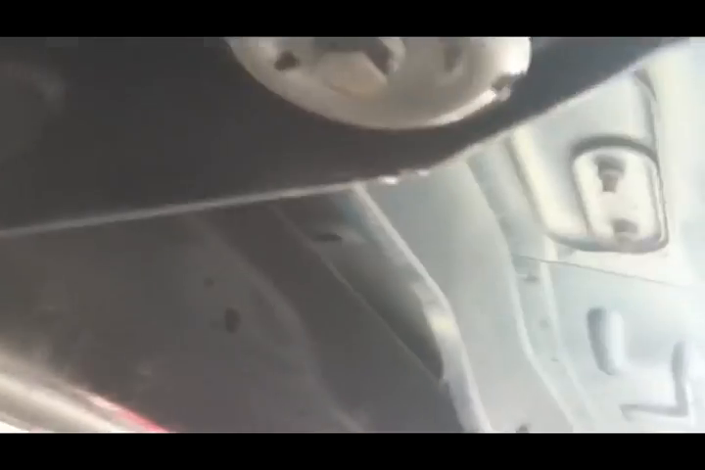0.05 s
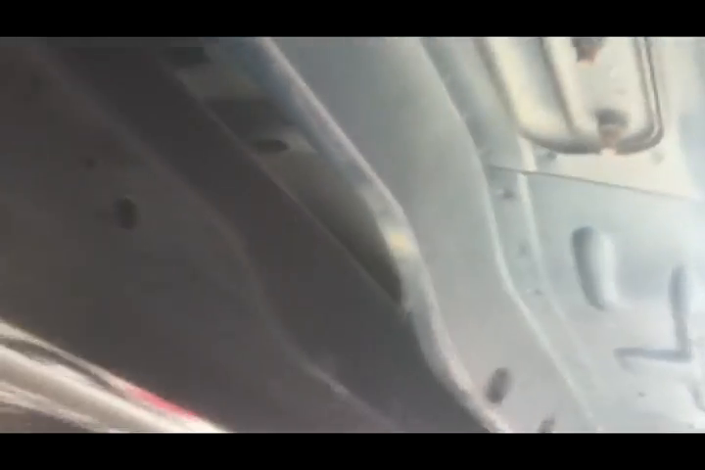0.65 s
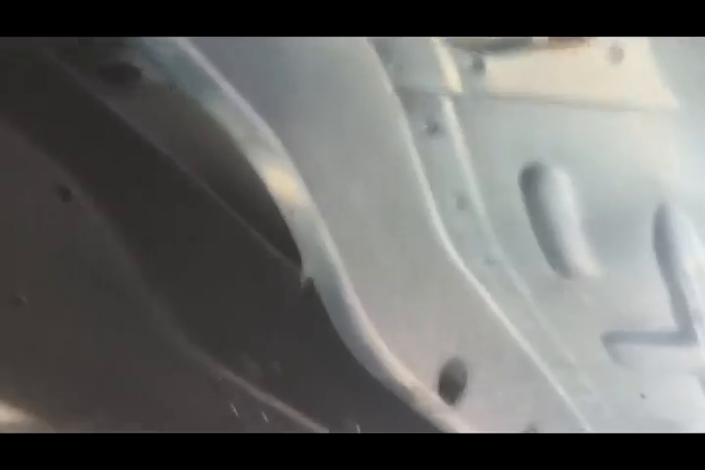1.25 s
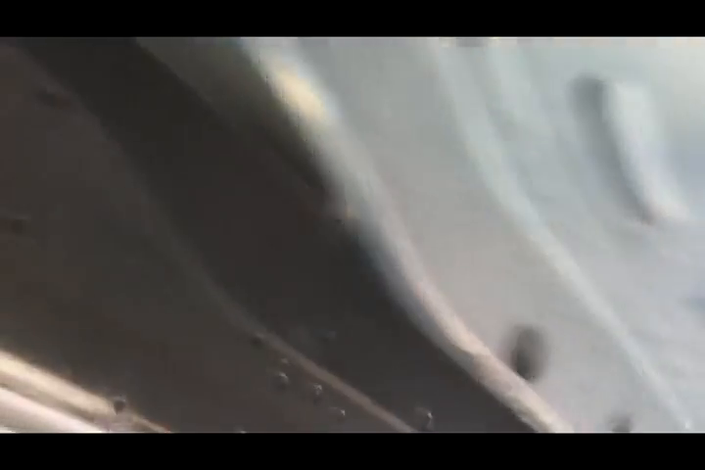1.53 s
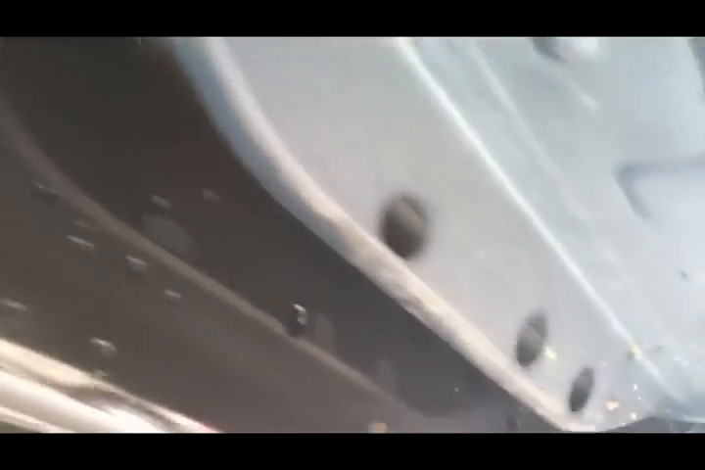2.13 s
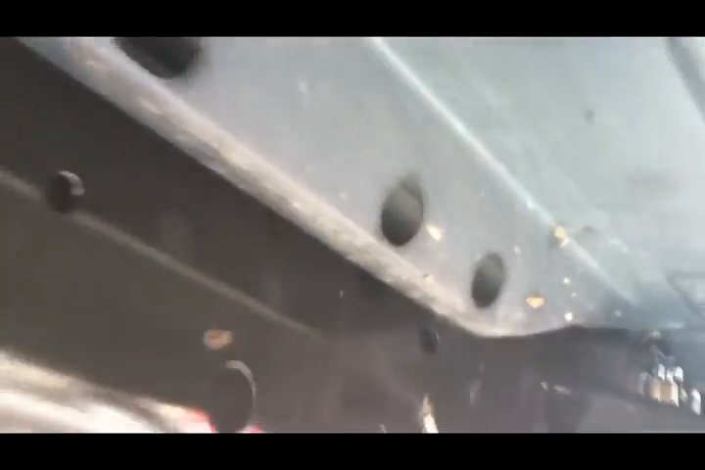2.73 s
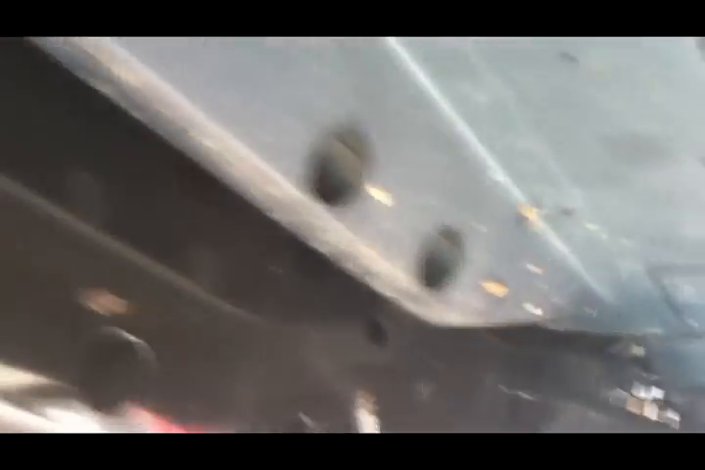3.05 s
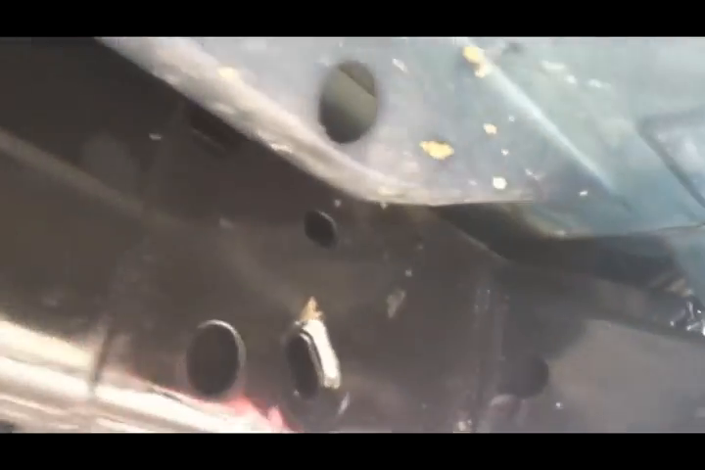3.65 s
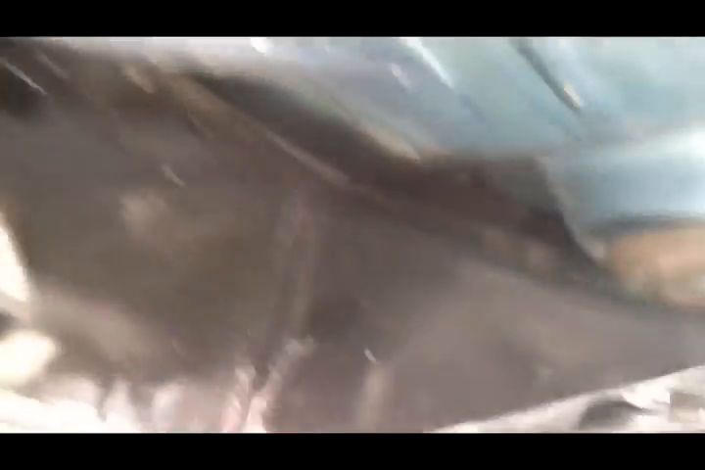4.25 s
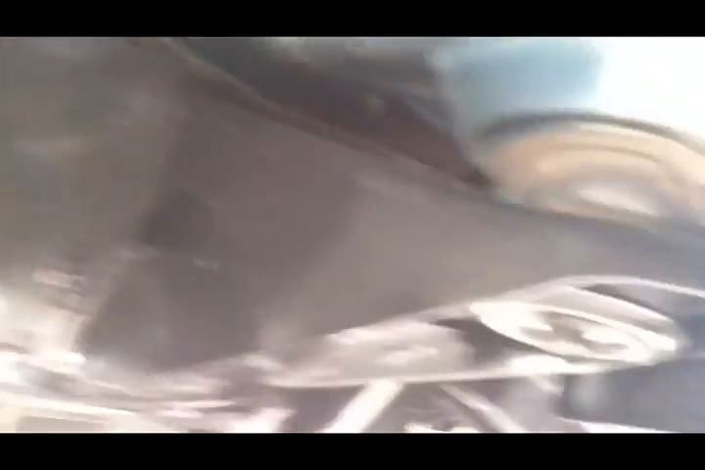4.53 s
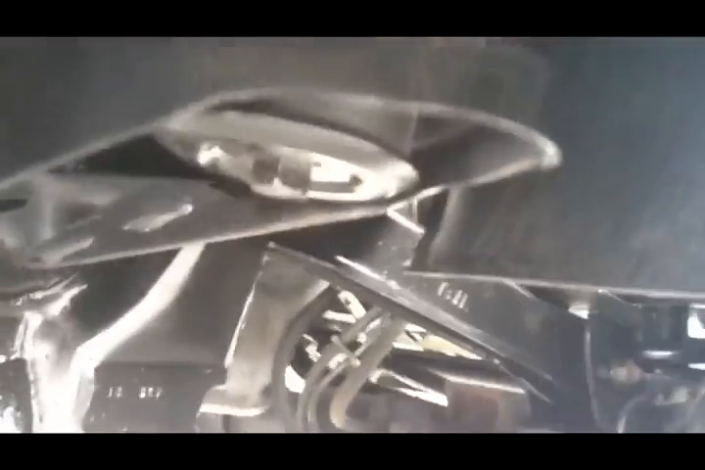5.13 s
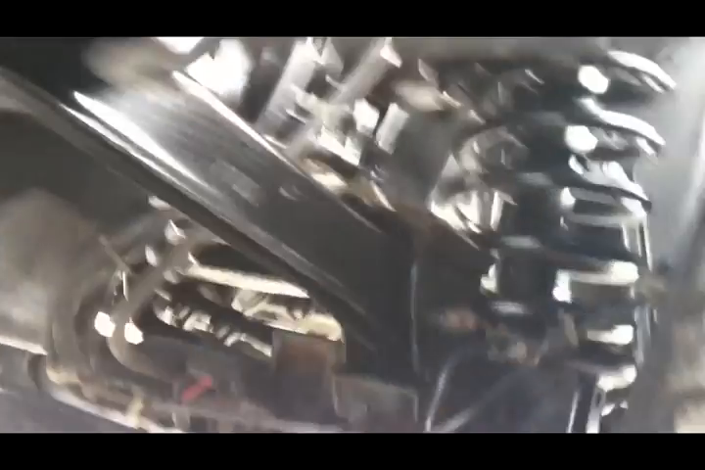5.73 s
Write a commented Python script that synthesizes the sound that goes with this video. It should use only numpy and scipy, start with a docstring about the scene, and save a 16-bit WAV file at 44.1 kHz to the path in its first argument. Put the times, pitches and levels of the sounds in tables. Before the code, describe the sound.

A handheld camera is moved about under a parked truck. Right at the microphone its plastic case gives scattered sharp clicks and knocks, while the grip rubs, catches and briefly squeaks on it. Late on, a louder knock is followed by one hard tap on the microphone, and a quick run of soft thumps comes at the end. Faint hollow workshop air and a distant hum continue underneath.

```python
"""Hollow workshop air and a faint distant hum, heard on a handheld camera moved about under a parked truck.
Right at the microphone the plastic case clicks and knocks as it shifts, and the grip rubs, catches
and squeaks on it. A very faint high whine passes twice. Through the camera body come a light touch,
later one hard tap on the microphone and, near the end, soft thumps of the hand against the case."""
import sys
import numpy as np
from scipy import signal
from scipy.fft import rfft, irfft, next_fast_len
from scipy.io import wavfile

SR = 44100
rng = np.random.default_rng(int(sys.argv[2]) if len(sys.argv) > 2 else 0)


def waveform_to_disk(signal):
    """Save audio, clipped to [-1, 1], as 16-bit WAV at the path in sys.argv[1]."""
    frames = np.transpose(np.atleast_2d(signal))
    scaled = np.clip(frames, -1, 1) * 32767
    samples = np.round(scaled).astype(np.int16)
    wavfile.write(sys.argv[1], SR, samples)


N = 263277
TIME = np.arange(N) / SR
NEAR = np.arange(-SR // 25, SR // 5) / SR   # seconds around one contact

# The plastic case around the microphone. Each row: resonance in Hz, width in Hz, boost in dB.
CASE_RESONANCES = [(250, 110, 7), (862, 120, 1), (1130, 8.1, 6.5), (1404, 47, 4), (1760, 150, 4),
                   (1975, 330, 6.5), (2380, 210, 1), (2540, 130, 0), (3137, 25, 4), (3960, 250, 0),
                   (4990, 57, 4.5)]


def from_db(db):
    """Decibels to gain."""
    return 10 ** (np.asarray(db) / 20)


def rms_one(x):
    """Scale to rms 1."""
    return x / np.sqrt(np.mean(x ** 2) + 1e-20)


def add(track, s, sound):
    """Lay one contact into the track at s seconds."""
    at = round(s * SR) + np.round(NEAR * SR).astype(int)
    inside = (at >= 0) & (at < N)
    track[at[inside]] += sound[inside]


def drift(rate):
    """A random wander of spread about 1, turning about rate times a second."""
    return np.interp(TIME * rate, np.arange(N // 10), rng.standard_normal(N // 10))


def band(x, hz, width_hz):
    """Ring one resonance, with gain 1 at its peak."""
    r = np.exp(-np.pi * width_hz / SR)
    feedback = [1, -2 * r * np.cos(2 * np.pi * hz / SR), r * r]
    return signal.lfilter(np.array([1, 0, -1]) * (1 - r * r) / 2, feedback, x)


def band_noise(samples, hz, width_hz):
    """White noise passed twice through one resonance."""
    return band(band(rng.standard_normal(samples), hz, width_hz), hz, width_hz)


def resonate(x, resonances):
    """Pass sound through a body that lifts or swallows certain bands."""
    for hz, width_hz, boost_db in resonances:
        x = x + (from_db(boost_db) - 1) * band(x, hz, width_hz)
    return x


def coloured(x, colour, bass_db=0, treble_db=0, bass_hz=550, treble_hz=2800):
    """Give steady noise a spectrum, with a shelf at each end; rms 1."""
    size = next_fast_len(len(x))
    hz = np.maximum(np.arange(size // 2 + 1) * SR / size, 1)
    points = np.array(colour)
    db = np.interp(np.log(hz), np.log(points[:, 0]), points[:, 1])
    db = db + bass_db / (1 + (hz / bass_hz) ** 4) + treble_db / (1 + (treble_hz / hz) ** 4)
    return rms_one(irfft(rfft(x, size) * from_db(db), size)[:len(x)])


def burst(noise, shape):
    """Noise under an envelope, scaled to the rms of that envelope."""
    return rms_one(noise * shape) * np.sqrt(np.mean(shape ** 2))


def slip(noise, swell_s, fall_s, tail_db, tail_s):
    """A rush of tiny slips builds up, lets go and leaves a weaker rattle behind."""
    after = np.maximum(NEAR, 0)
    rise = np.exp(np.minimum(NEAR, 0) / swell_s)
    decay = np.exp(-after / fall_s) + from_db(tail_db) * np.exp(-after / tail_s)
    return burst(noise, rise * decay)


def workshop(hum_waver_db=3.0, hum_wander_rad=1.2, hiss_waver_db=2.0):
    """The room from under the truck: hollow air, low rumble, distant machinery and a narrow hiss."""
    # Spectrum of the air. Each row: frequency in Hz, relative level in dB.
    air_colour = [(25, -37), (60, -16.5), (90, -18), (130, 1), (170, -4), (225, -2), (350, -12), (450, -12),
                  (680, -14.5), (900, -10), (1400, -14.5), (2400, -25), (5000, -31.5), (12000, -47.5),
                  (15000, -61)]
    # Its hollow resonances. Each row: frequency in Hz, width in Hz, boost in dB.
    hollows = [(568.4, 8.1, 7.5), (876, 7.6, 3), (1220, 53, -1), (1320, 11, 3), (1470, 49, 0),
               (1710, 42, 2), (3230, 170, 5.5)]
    # Tones of the far machinery. Each row: pitch in Hz, relative level in dB.
    hum_tones = [(131, 0.5), (225, -9)]
    # Peaks of the hiss. Each row: frequency in Hz, filter width in Hz, relative level in dB.
    hiss_peaks = [(3850, 220, -4), (4070, 280, 0)]
    # Each layer as the microphone turns. Each row: time in seconds, relative level in dB.
    air_levels = [(0.0, -42), (0.97, -42.5), (2.39, -45), (4.87, -41.5), (4.99, -43), (5.6, -42.5)]
    rumble_levels = [(0, -50), (1.5, -51), (2.7, -50), (4.0, -51.5), (4.8, -56.5), (5.6, -52.5)]
    hum_levels = [(0, -76), (1.4, -51), (2.3, -60), (3.95, -48), (4.5, -52.5), (5.6, -55.5)]
    hiss_levels = [(0, -62.5), (2.6, -62), (3.6, -63), (5.6, -66.5)]
    curves = (air_levels, rumble_levels, hum_levels, hiss_levels)
    air_db, rumble_db, hum_db, hiss_db = (np.interp(TIME, *np.transpose(curve)) for curve in curves)
    air = from_db(air_db - 1.5) * resonate(coloured(rng.standard_normal(N), air_colour), hollows)
    rumble = from_db(rumble_db) * rms_one(band_noise(N, hz=188.7, width_hz=117))
    hum = np.zeros(N)
    for hz, db in hum_tones:
        gain = from_db(hum_db + db + hum_waver_db * drift(6.5))
        hum += gain * np.sqrt(2) * np.sin(2 * np.pi * hz * TIME + hum_wander_rad * drift(15))
    peaks = sum(from_db(db) * band_noise(N, hz, width) for hz, width, db in hiss_peaks)
    hiss = from_db(hiss_db + hiss_waver_db * drift(9)) * rms_one(peaks)
    return air + rumble + hum + hiss


def clicks(ticks_per_s=1.5, grain_db=6.5, variety_db=2.0, crack_s=0.00018):
    """Small bright slips along the seams of the case, close up, each with a colour of its own."""
    # Each row: time in seconds, relative level in dB, shelf on lows and mids in dB, swell in seconds.
    seam_slips = [(0.229, -46.5, -8, 0.0044), (0.494, -37, -1, 0.0039), (0.504, -37.5, 10, 0.0026),
                  (1.064, -45.5, -9, 0.0043), (1.306, -29.5, -15.5, 0.002), (1.5672, -39.5, -8, 0.00047),
                  (1.684, -36.5, -1, 0.0046), (1.935, -40.5, 2, 0.0048), (2.308, -45.5, 1, 0.0075),
                  (2.422, -42.5, -4, 0.0014), (2.662, -45, 17, .001), (2.692, -35, -34, 0.0017),
                  (2.706, -35, -28, 0.0018), (3.729, -44.5, 2, 0.0013), (4.204, -42, 12, 0.006),
                  (4.596, -37, 3, 0.0035), (4.846, -34, 2.5, 0.0075), (5.031, -39, 1.5, 0.00087),
                  (5.236, -29.5, -3.5, 0.0027), (5.589, -46, 5, 0.00053), (5.731, -41, 17, 0.0026),
                  (5.797, -48, -35, 0.0042), (5.877, -39.5, 9, 0.0044)]
    # Spectrum common to all clicks. Each row: frequency in Hz, relative level in dB.
    colour = [(100, 2.5), (400, 3.5), (900, 5.5), (2000, 0), (3500, 8), (5500, 4), (8000, -4),
              (11000, -17.5), (15000, -34)]
    # faint ticks come by chance as the case settles
    ticks = [(s, -57, 0, 0.0006) for s in TIME[rng.random(N) < ticks_per_s / SR]]
    colour_hz = np.geomspace(500, 15000, num=50)
    out = np.zeros(N)
    for s, db, shelf_db, swell in seam_slips + ticks:
        fall = 0.0028 + 1.04 * swell   # a click that builds slowly also dies slowly
        white, sizes = rng.standard_normal((2, len(NEAR)))
        own_colour = np.column_stack([colour_hz, rng.normal(0, variety_db, len(colour_hz))])
        grains = coloured(white * from_db(grain_db * sizes), own_colour)
        noise = coloured(grains, colour, shelf_db, bass_hz=3440)
        rattle = slip(noise, swell, fall, tail_db=-6, tail_s=3.65 * fall)
        # the moment of letting go is a tiny crack
        crack = coloured(sizes, colour, shelf_db, treble_db=-16, treble_hz=10000)
        crack *= from_db(-1) * np.exp(-np.abs(NEAR) / crack_s)
        add(out, s, from_db(db - 1) * (rattle + crack))
    return resonate(out, CASE_RESONANCES)


def knocks(driven_db=2.0):
    """The case snaps under the grip: a short rattle, and the modes of the place that gave way."""
    # Each row: time in seconds, relative level, bass shelf and treble shelf in dB,
    # swell and fall in seconds, ring gain in dB, place on the case.
    snaps = [(0.5212, -18.5, -7, -8, 0.0012, 0.0018, -7, "panel"),
             (0.5244, -15, 3, 1, 0.0012, 0.0031, 4.5, "panel"),
             (0.5328, -28, 3, 1, 0.00049, 0.0062, -7, "panel"),
             (2.6768, -23.5, 3, 19, 0.0002, 0.0037, -1, "rim"),
             (3.3055, -20.5, -9.5, 5.5, 0.0019, 0.0045, -1.5, "latch"),
             (3.3122, -23.5, -8, 5, 0.0013, 0.0048, -6, "latch"),
             (3.3330, -21.5, -7.5, -3.5, 0.0014, 0.0031, 0.5, "seam"),
             (4.8734, -11.5, -2, -6, 0.0022, 0.0036, 2.5, "shell")]
    # Spectrum of the rattle. Each row: frequency in Hz, relative level in dB.
    colour = [(40, -48), (100, 0), (200, 5), (400, 0.5), (600, 4.5), (900, 2), (2000, -3), (3200, -2.5),
              (5500, -9.5), (8000, -17.5), (12000, -36), (16000, -66)]
    # Modes of each place. Each row: pitch in Hz, relative level in dB, decay in seconds.
    panel = [(266, -7.5, 0.014), (372, -1.5, 0.0044), (465, -13.5, 0.01), (668, -15.5, 0.012),
             (1106, -8, 0.0071), (1310, -18, 0.011), (2065, -12, 0.01), (2260, -16, 0.007),
             (2550, -17, 0.014), (2630, -15.5, 0.012), (2870, -10, 0.0034), (3046, -17, 0.011),
             (4070, -27, 0.011)]
    seam = [(460, -15.5, 0.013), (572, -12.5, 0.019), (908, -7, 0.011), (1087, -9, 0.018),
            (1370, -16, 0.0096), (1900, 5, 0.0023), (2140, -6, .006), (2300, -10, 0.014),
            (2520, -12, 0.0078), (3550, -19, .007), (3930, -20, 0.0099)]
    latch = [(790, -18, 0.016), (1460, -13, 0.011), (1860, -1, 0.0055), (3114, -7, 0.007), (3680, -9, .005),
             (3840, -14, .008), (4830, -21, .009)]
    shell = [(287, -13.5, 0.014), (885, 3.5, 0.0017), (1104, -11, 0.0078), (1460, -9, 0.0074),
             (1654, -9, 0.0045), (1970, -10.5, 0.01), (2355, -16.5, 0.015), (2740, -8, 0.0025),
             (3030, -13.5, 0.008), (4160, -18.5, 0.0079), (5470, -17, 0.0015)]
    rim = [(1760, -7, 0.0063), (2200, -17, .005), (2520, -8, 0.0081), (2710, -8, .005), (2950, -8, 0.0053)]
    # Bands between each place's modes, nearly all dips. Each row: centre in Hz, width in Hz, gain in dB.
    dead_spots = {"panel": [(1830, 250, -11), (2400, 120, -9), (3680, 310, -7)], "seam": [(1500, 340, 1.5),
                  (2770, 220, -10)], "latch": [(1150, 200, -6), (2330, 250, -7)], "shell": [(530, 180, -4),
                  (1270, 220, -11), (2560, 150, -4)], "rim": [(1300, 600, -12), (3960, 580, -16)]}
    modes = {"panel": panel, "seam": seam, "latch": latch, "shell": shell, "rim": rim}
    rattle, rings = np.zeros(N), np.zeros(N)
    for s, db, bass_db, treble_db, swell, fall, ring_db, place in snaps:
        noise = coloured(rng.standard_normal(len(NEAR)), colour, bass_db, treble_db)
        snap = slip(noise, swell, fall, tail_db=-10, tail_s=6.2 * fall)
        add(rattle, s, from_db(db - 4) * resonate(snap, dead_spots[place]))
        # the modes swing harder while the snap still drives them
        drive = from_db(db + ring_db + driven_db * np.exp(-(NEAR / fall) ** 2))
        for hz, mode_db, decay in modes[place]:
            shape = drive * np.exp(np.minimum(NEAR / swell, -NEAR / decay))
            add(rings, s, from_db(mode_db) * shape * np.cos(2 * np.pi * (hz * NEAR + rng.random())))
    return resonate(rattle, CASE_RESONANCES) + rings


def stroke(start, length, db, attack_s=0.011, release_s=0.026):
    """Pressure of one stroke: the grip takes hold, stays and lets go."""
    t = TIME - start
    return from_db(db) * np.exp(np.minimum(t, 0) / attack_s - np.maximum(t - length, 0) / release_s)


def rubbing(grains_per_s=3500, sticks_per_s=60, stick_s=0.00069, creep_db=-60.5, uneven_db=2.5):
    """The grip slides on the case in dense, uneven grains; between strokes it barely creeps."""
    # Each row: start in seconds, length in seconds, relative level in dB.
    strokes = [(0.937, 0.0079, -47.5), (0.997, .07, -48), (1.27, 0.015, -41), (1.374, 0.064, -54.5),
               (1.657, 0.032, -50.5), (1.95, 0.089, -55), (2.277, 0.011, -51), (2.35, 0.05, -45.5),
               (2.676, 0.025, -37.5), (3.046, 0.039, -47), (3.663, 0.04, -51.5), (3.812, 0.033, -52.5),
               (3.895, 0.045, -41.5), (4.187, 0.17, -57), (4.415, 0.1, -54), (4.526, 0.063, -41.5),
               (4.808, 0.079, -54), (5.118, 0.12, -41), (5.468, 0.056, -51.5), (5.75, 0.088, -52),
               (5.863, 0.036, -45.5)]
    # Spectrum of skin sliding on plastic. Each row: frequency in Hz, relative level in dB.
    colour = [(100, -18), (400, -4.5), (900, 0.5), (2000, -1.5), (3500, 3), (5500, 1), (8000, -7.5),
              (11000, -22), (15000, -47)]
    grains = (rng.random(N) < grains_per_s / SR) * rng.standard_normal(N)
    friction = rms_one(grains) + from_db(-4) * rng.standard_normal(N)
    # the skin sticks and frees itself in gritty little surges
    sticks = (rng.random(N) < sticks_per_s / SR) * rng.random(N)
    surges = signal.lfilter([1], [1, -np.exp(-1 / (stick_s * SR))], sticks + 1e-18)
    rub = rms_one(resonate(coloured(friction * (1 + surges), colour), CASE_RESONANCES))
    pressure = np.sqrt(from_db(creep_db) ** 2 + sum(stroke(*row) ** 2 for row in strokes))
    return pressure * from_db(uneven_db * drift(120) - 0.5) * rub


def catches(top_cut_hz=8500):
    """The grip catches and snaps free: one abrupt slip, a crisp tick around a pitch of its own."""
    # Each row: time in seconds, relative level in dB, pitch in Hz.
    releases = [(1.013, -36.5, 3750), (1.042, -45, 5700), (1.531, -41, 4940), (1.5668, -35.5, 4950),
                (1.934, -37.5, 7600), (2.3695, -43.5, 5000), (2.380, -45, 5500), (2.4222, -44, 6000),
                (2.6767, -37, 3340), (2.6928, -30, 8000), (2.699, -33, 4000), (3.6625, -40, 2980),
                (3.681, -41, 6850), (3.817, -41, 6500), (3.83, -45, 5500), (3.8955, -46, 4800),
                (3.91, -42, 4900), (3.9204, -27.5, 4300), (3.937, -49, 4000), (4.0057, -37, 2260),
                (4.025, -39, 2500), (4.045, -32, 2500), (4.073, -51, 3280), (4.2019, -31, 2820),
                (4.2055, -30, 3100), (4.256, -38, 3480), (4.283, -45, 4000), (4.5934, -41.5, 2610),
                (4.601, -35, 4000), (5.1152, -39, 6500), (5.1213, -32, 7040), (5.138, -35.5, 3900),
                (5.144, -29.5, 4200), (5.155, -32, 6000), (5.1575, -33, 5900), (5.1737, -37, 6000),
                (5.1968, -31, 5500), (5.231, -31, 3370), (5.304, -42, 3000), (5.635, -38.5, 3060),
                (5.732, -41, 2200), (5.7965, -36.5, 6860), (5.876, -33, 3500)]
    out = np.zeros(N)
    for s, db, hz in releases:
        noise = rms_one(band_noise(len(NEAR), hz, width_hz=hz))
        tick = slip(noise, swell_s=0.000053, fall_s=0.00068, tail_db=-14, tail_s=0.019)
        add(out, s, from_db(db) * tick)
    return signal.sosfilt(signal.butter(2, top_cut_hz, fs=SR, output="sos"), out + 1e-18)


def soft_push(hz, length, lead=0, glide=0):
    """A soft contact swells and dies within a few cycles; glide slides its pitch as pressure changes."""
    t = NEAR + lead
    octaves = glide * np.clip(t, -3 * length, 3 * length)
    cycles = hz * t * 2 ** (octaves / 2)
    return -np.cos(2 * np.pi * cycles) / np.cosh(np.clip(2 * t / length, -20, 20))


def taps(dull_hz=720, tick_lead_s=0.000747):
    """Dull taps right on the microphone, carried through the body of the camera."""
    # Each row: time in seconds, relative level in dB, treble slope in dB per octave.
    touches = [(1.2496, -42, -8), (1.2544, -30.5, -19), (1.2592, -32.5, -18), (4.9782, 1.5, 0)]
    # What a tap rings with. Each row: pitch in Hz, relative level in dB, length in seconds.
    modes = [(273, -5, 0.0022), (526, -6.5, 0.001), (715, -1.5, 0.0012), (1380, 0.5, 0.00036)]
    # Skin meeting plastic: pitch in Hz, relative level in dB, length in seconds.
    skin_tick = (4660, -16.5, 0.00026)
    tick_hz, tick_db, tick_length = skin_tick
    out = np.zeros(N)
    for s, db, slope_db in touches:
        for hz, mode_db, length in modes:
            # a gentle touch hardly wakes the higher modes
            dulling_db = slope_db * max(np.log2(hz / dull_hz), 0)
            add(out, s, from_db(db + mode_db + dulling_db) * soft_push(hz, length))
        # the first touch ticks just ahead of the full push
        tick_gain = from_db(db + tick_db + slope_db * np.log2(tick_hz / dull_hz))
        add(out, s, -tick_gain * soft_push(tick_hz, tick_length, tick_lead_s))
    return out


def squeaks(swell_s=0.00088):
    """Skin chatters on the plastic beside the microphone, in short rough chirps."""
    # Each row: time in seconds, level in dB, pitch in Hz, fall in seconds.
    chirps = [(2.705, -32.5, 5120, 0.011), (4.5575, -46, 5600, .005), (5.138, -37, 4100, .008),
              (5.1845, -38, 4800, 0.0037), (5.211, -38, 4000, .018)]
    out = np.zeros(N)
    for s, db, hz, fall in chirps:
        noise = band_noise(len(NEAR), hz, width_hz=840)
        shape = np.exp(np.minimum(NEAR / swell_s, -NEAR / fall))
        add(out, s, from_db(db) * burst(noise, shape))
    return out


def whine(wander_rad=3.8):
    """A very faint high tone fades in and out, perhaps the lens focusing."""
    # Each row: midpoint in seconds, length in seconds, pitch in Hz, level in dB.
    swells = [(3.252, .14, 7500, -73), (5.04, 0.24, 7400, -72)]
    phase = wander_rad * drift(40)
    out = np.zeros(N)
    for s, length, hz, db in swells:
        fade = np.exp(-(2 * (TIME - s) / length) ** 2)
        out += from_db(db) * np.sqrt(2) * fade * np.sin(2 * np.pi * hz * TIME + phase)
    return out


def thumps(flex_db=-18):
    """The hand bumps the case softly; the flexing plastic adds a weaker, shorter overtone."""
    # Each row: time in seconds, level in dB, pitch in Hz, length in seconds, glide in octaves a second.
    bumps = [(5.623, -25.5, 162, 0.0041, 0), (5.649, -28.5, 137, 0.0069, -10),
             (5.710, -23.5, 183, 0.0049, -12), (5.721, -25.5, 173, 0.0055, 0), (5.748, -28, 120, 0.011, 13),
             (5.772, -18, 163.5, 0.0098, -23), (5.8045, -17, 160, 0.0068, 20),
             (5.829, -25, 181, 0.011, -17), (5.857, -14, 147.5, 0.0062, 12),
             (5.867, -12.5, 190, 0.0042, 13), (5.882, -26, 130, 0.0065, 0), (5.918, -22, 177, 0.0067, 27),
             (5.930, -30, 160, 0.0044, 0), (5.966, -12.5, 135, 0.002, 7)]
    out = np.zeros(N)
    for s, db, hz, length, glide in bumps:
        overtone = from_db(flex_db) * soft_push(1.84 * hz, 0.72 * length)
        add(out, s, from_db(db) * (soft_push(hz, length, glide=glide) + overtone))
    return out


def scene():
    """Close handling noise and the room beyond, all at the camera's one microphone."""
    handling = knocks() + clicks() + catches() + squeaks() + rubbing() + taps() + thumps()
    return (handling + workshop() + whine())[None]


def record(dry, overload=0.72, bass_cut_hz=70, top_cut_hz=16200):
    """The microphone overloads and flattens the loudest peaks; the deep bass and the top are cut."""
    flattened = dry / (1 + (dry / overload) ** 8) ** (1 / 8)
    thinned = signal.sosfilt(signal.butter(1, bass_cut_hz, "high", fs=SR, output="sos"), flattened)
    return signal.sosfilt(signal.cheby2(12, 60, top_cut_hz, fs=SR, output="sos"), thinned)


dry = scene()
out = record(dry)
waveform_to_disk(out)
```